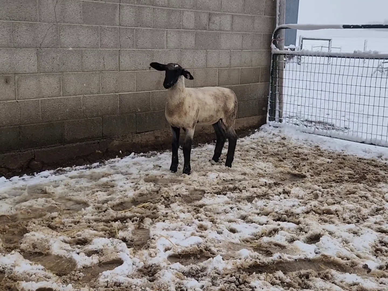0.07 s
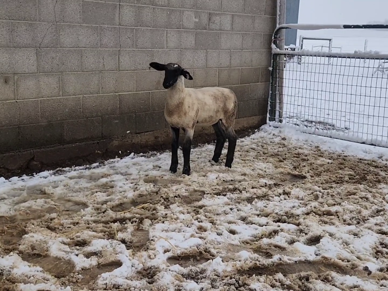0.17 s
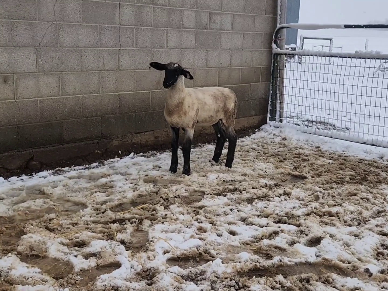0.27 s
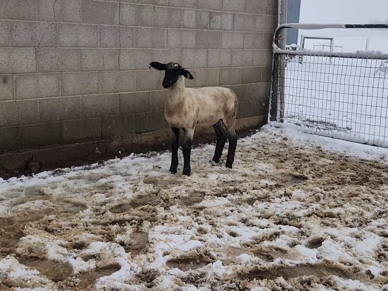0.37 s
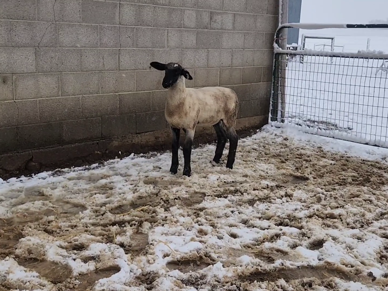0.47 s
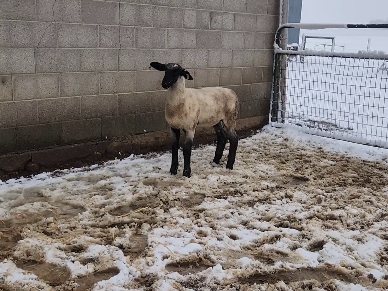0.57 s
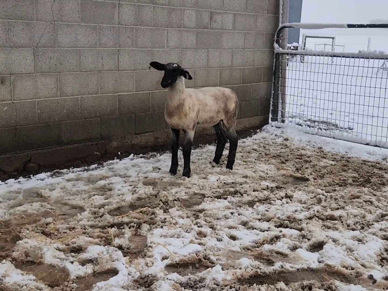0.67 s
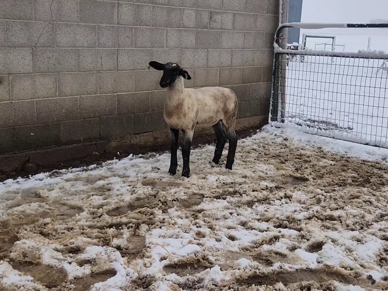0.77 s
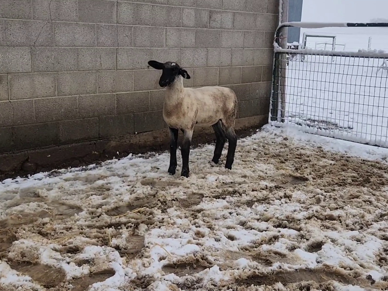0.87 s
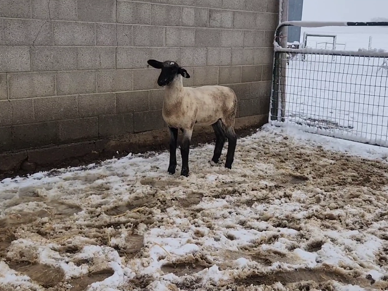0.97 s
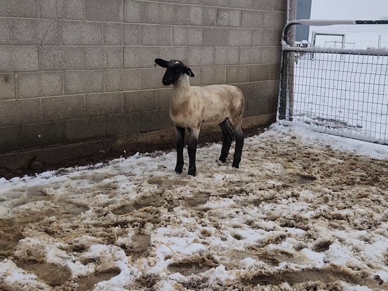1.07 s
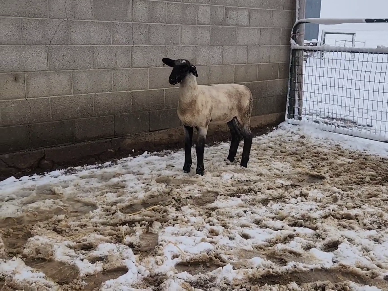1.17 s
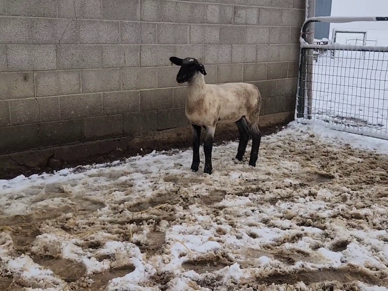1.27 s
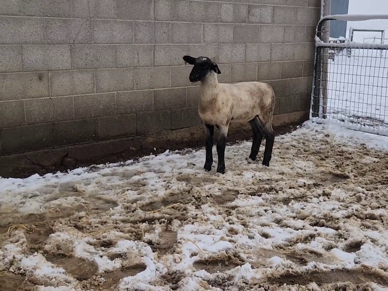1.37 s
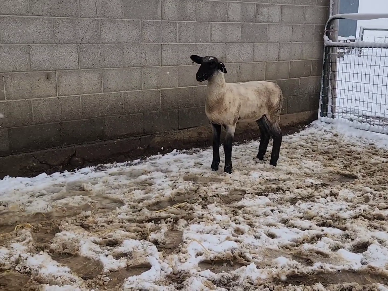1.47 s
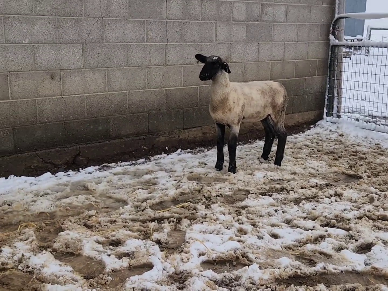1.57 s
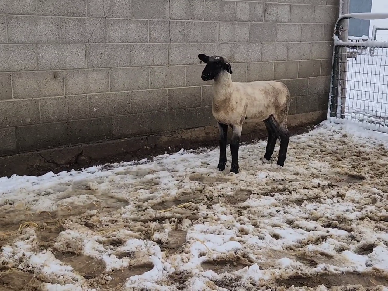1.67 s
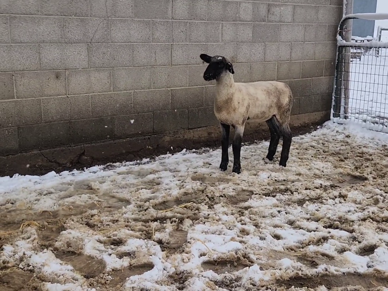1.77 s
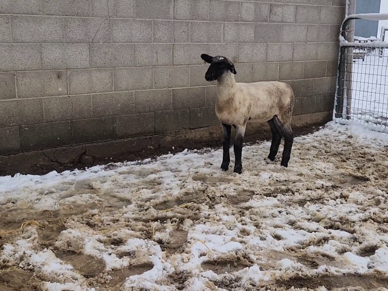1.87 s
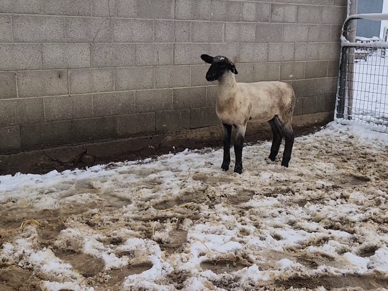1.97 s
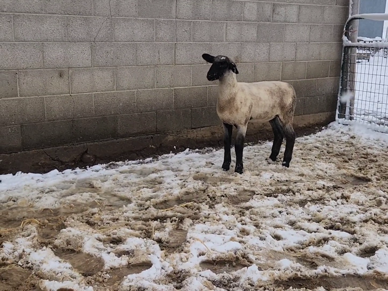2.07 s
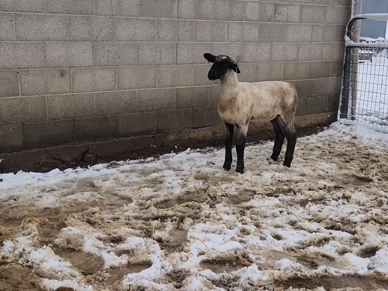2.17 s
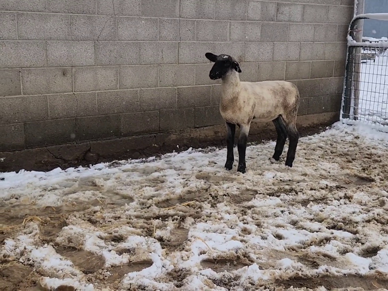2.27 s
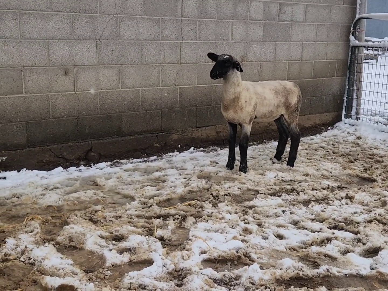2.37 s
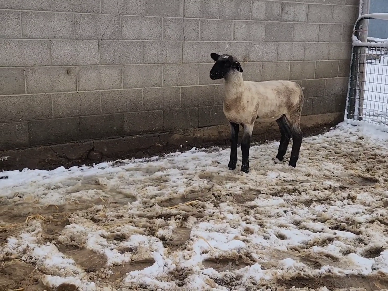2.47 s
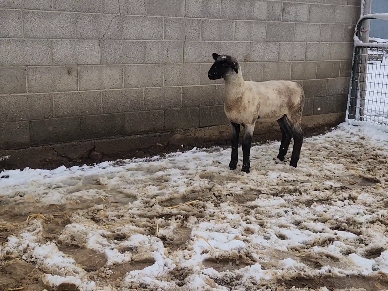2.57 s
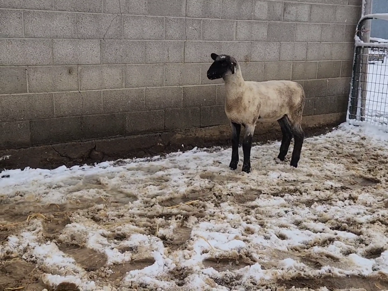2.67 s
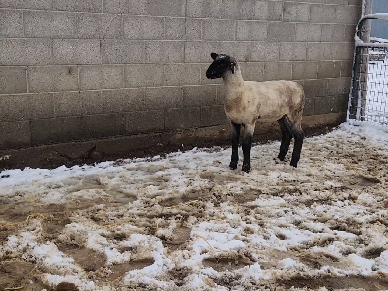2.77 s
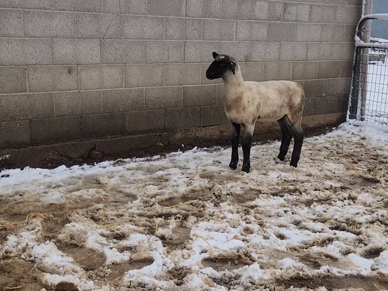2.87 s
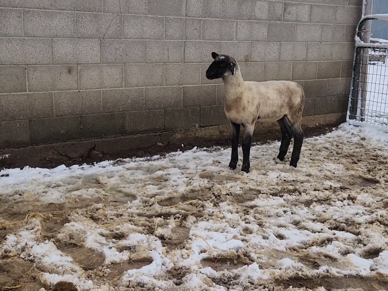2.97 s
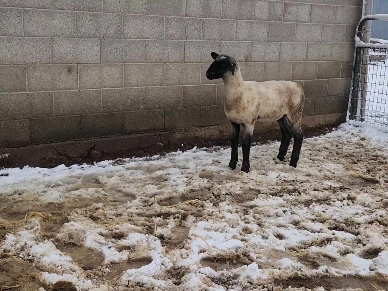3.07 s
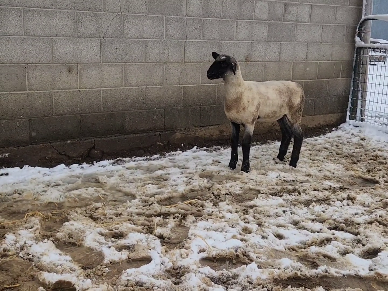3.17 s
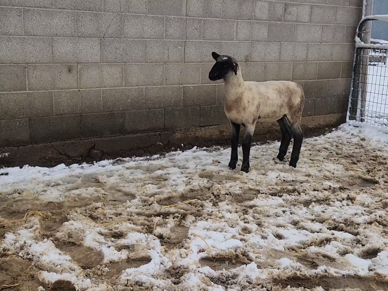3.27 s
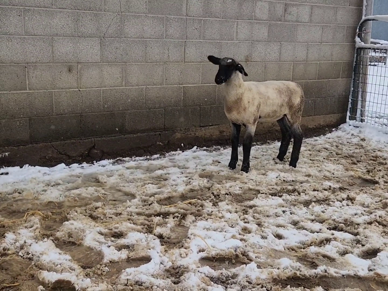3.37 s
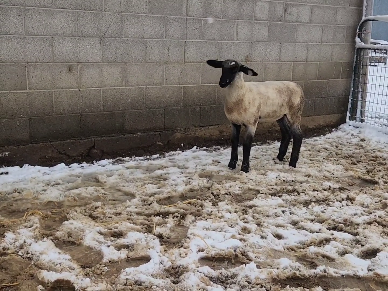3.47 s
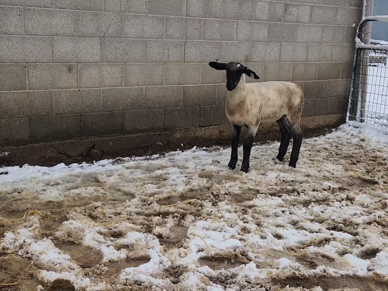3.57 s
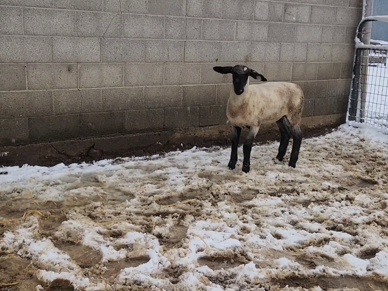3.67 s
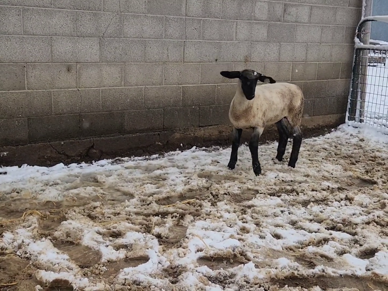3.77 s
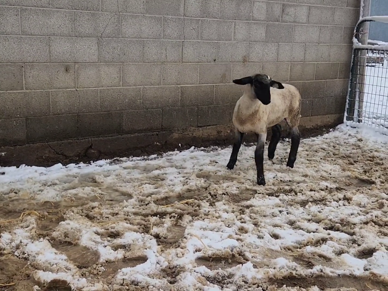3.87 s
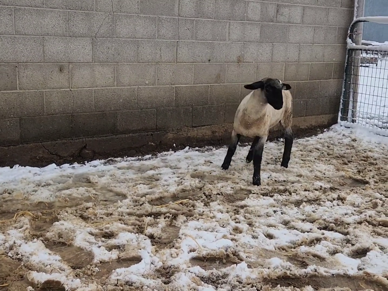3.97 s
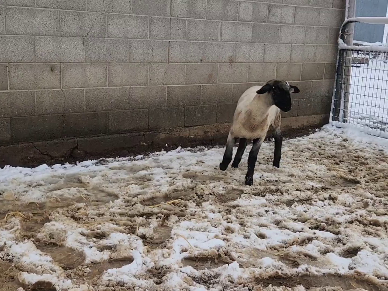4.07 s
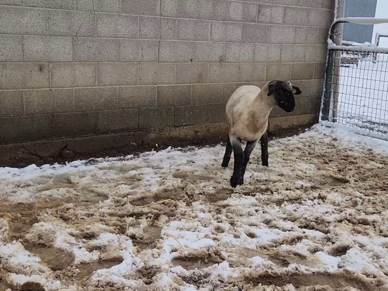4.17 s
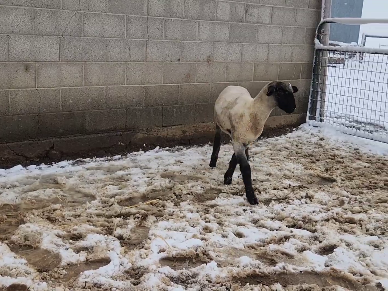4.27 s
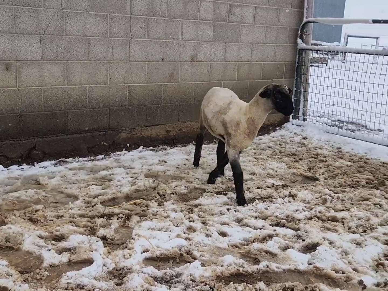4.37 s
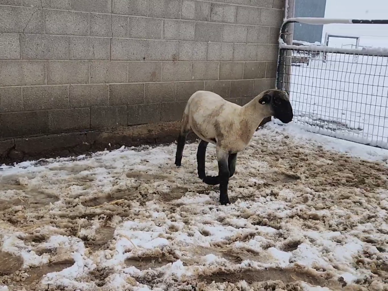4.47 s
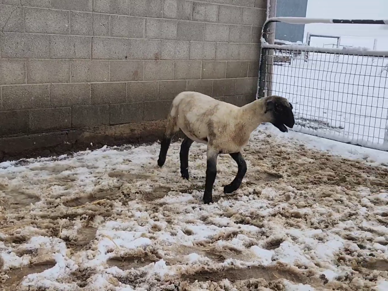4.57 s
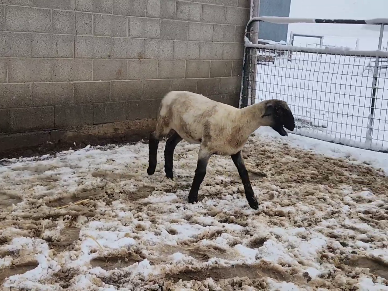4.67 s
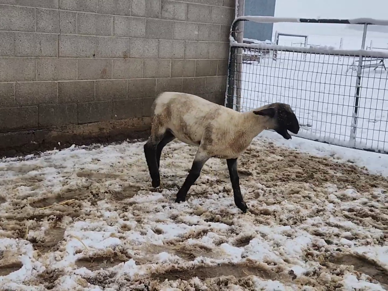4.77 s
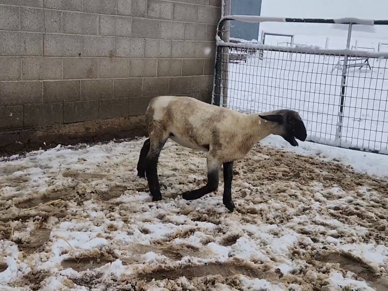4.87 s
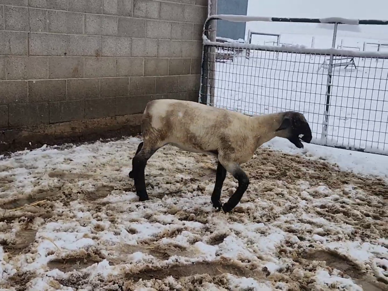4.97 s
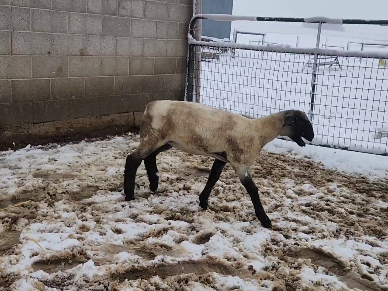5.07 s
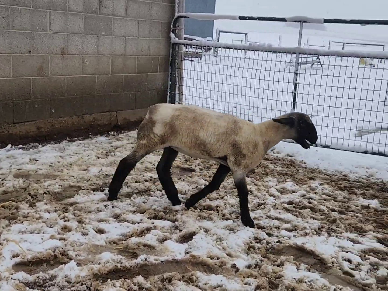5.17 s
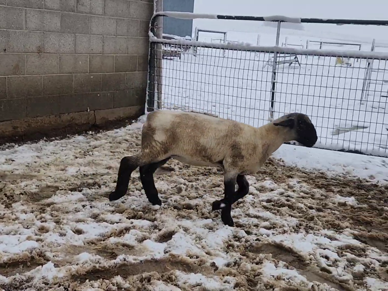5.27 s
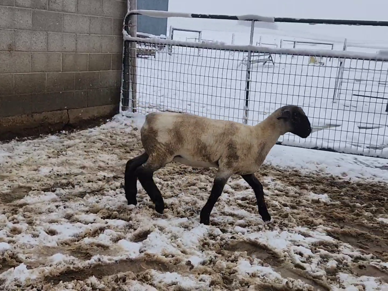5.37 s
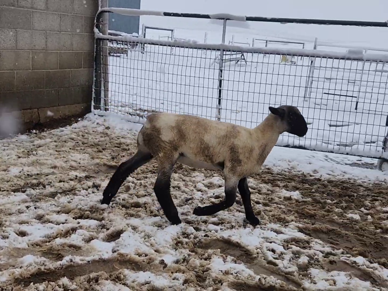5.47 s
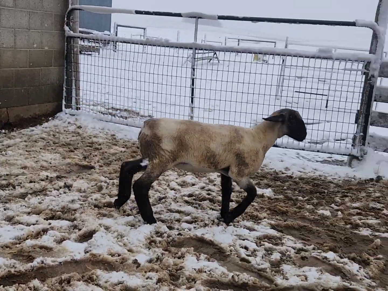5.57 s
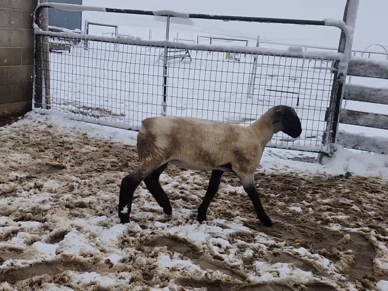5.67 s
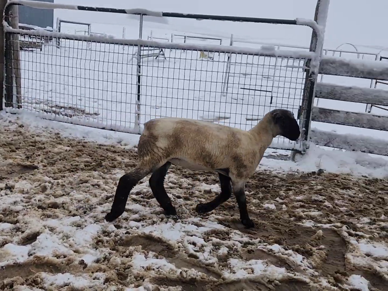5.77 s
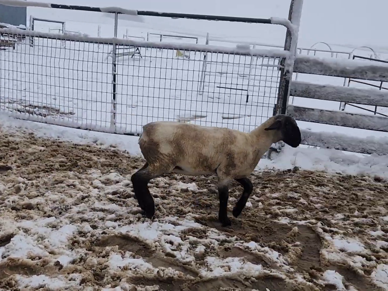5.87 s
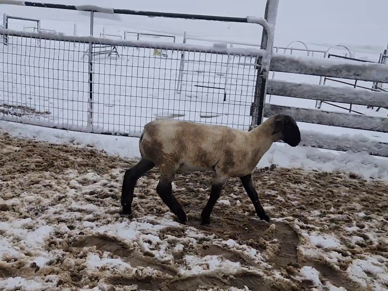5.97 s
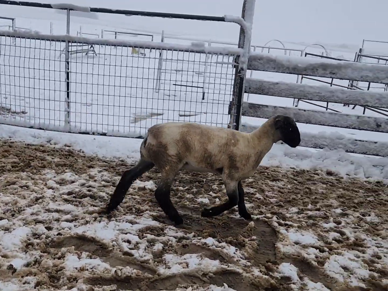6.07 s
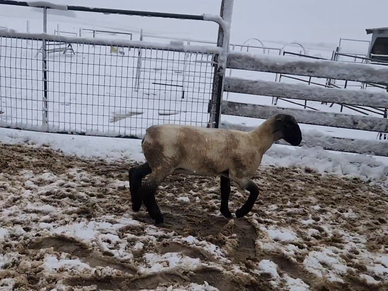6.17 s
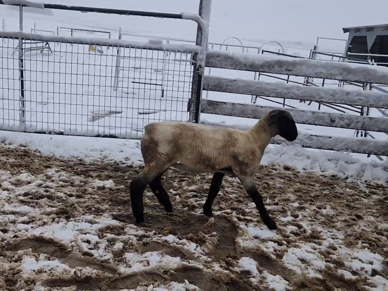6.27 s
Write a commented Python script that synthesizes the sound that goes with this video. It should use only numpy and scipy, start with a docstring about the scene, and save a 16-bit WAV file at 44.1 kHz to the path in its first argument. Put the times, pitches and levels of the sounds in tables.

```python
"""A lamb's hum and hoarse bleat

A lamb in a snowy pen hums with closed mouth, then bleats once, loud and hoarse, beside a block wall.
Its voice is a buzz shaped by nose or throat, shaken by a flutter; shaped noise makes the wall's answer.
Near the microphones shaped noise rustles in strokes, slush ticks, and fading low tones thud.
A light wind rumbles in slowly swelling low noise, over a faint hush."""
import sys
import numpy as np
from scipy import signal
from scipy.fft import rfft, irfft, next_fast_len
from scipy.io import wavfile
from scipy.ndimage import map_coordinates

SR = 44100
rng = np.random.default_rng(int(sys.argv[2]) if len(sys.argv) > 2 else 0)


def master(y):
    """Save y as 16-bit WAV."""
    cut = np.clip(np.atleast_2d(y).T, -1, 1)
    pcm = np.round(cut * 32767)  # scale
    wavfile.write(sys.argv[1], SR, pcm.astype(np.int16))


N = 278403  # length in samples


def amp(db):
    """Turn decibels into a gain."""
    return 10 ** (np.asarray(db) / 20)


def unit(x):
    """Scale a sound to an rms level of 1."""
    return x / np.sqrt(np.mean(x ** 2) + 1e-20)


def along(points, hz):
    """Read a curve of (Hz, value) points at any frequency, on a log axis."""
    point_hz, value = np.transpose(points)
    return np.interp(np.log(hz + 1), np.log(point_hz + 1), value)


def curves(rows, t):
    """Read each column after the time column at the times t."""
    time_s, *columns = np.transpose(rows)
    return [np.interp(t, time_s, column) for column in columns]


def wobble(rate, size):
    """Make a smooth random curve with rate random points a second."""
    points = rng.standard_normal(int(size * 2000 / SR) + 4)
    return map_coordinates(points, [np.arange(size) * rate / SR])


def filtered(x, response):
    """Change the strength and timing of each frequency in x by a response."""
    size = next_fast_len(x.shape[-1] + 8192)
    spectrum = rfft(x, size) * response(np.fft.rfftfreq(size, 1 / SR))
    return irfft(spectrum, size)[..., :x.shape[-1]]


def causal(points, hz):
    """Build a response from (Hz, dB) points that reacts as promptly as it can (minimum phase)."""
    cepstrum = irfft(np.log(amp(along(points, hz)) + 1e-6))
    middle = len(cepstrum) // 2
    cepstrum[1:middle] *= 2
    cepstrum[middle + 1:] = 0
    return np.exp(rfft(cepstrum, 2 * len(hz) - 1))


def ports(x, balance, lead_s):
    """Two microphones hear x with unequal colour, the left one lead_s earlier."""
    def half(hz):
        return amp(along(balance, hz) / 2) * np.exp(1j * np.pi * hz * lead_s)
    return filtered(x * np.ones((2, 1)), lambda hz: [half(hz), 1 / half(hz)])


def noise(spectrum, alike, grainy_db, rate):
    """Make two partly alike noises that flicker in level together, at rms 1."""
    a, b = rng.standard_normal((2, N)) * amp(grainy_db * wobble(rate, N))
    turn = np.arccos(np.clip(alike, 0, 1)) / 2
    pair = np.cos(turn) * a + np.sin(turn) * b * np.array([[1], [-1]])
    return unit(filtered(pair, lambda hz: amp(along(spectrum, hz))))


def crackle(events, width):
    """Bursts of noise around a centre pitch that start at once and die away."""
    out = np.zeros(N + SR)
    t = np.arange(SR // 4) / SR
    for start_s, level_db, centre_hz, t60_s in events:
        def band(hz):
            spread = 1j * hz * width
            return (spread / (centre_hz - hz ** 2 / centre_hz + spread)) ** 2
        grain = unit(filtered(rng.standard_normal(len(t)), band))
        out[round(start_s * SR):][:len(t)] += amp(level_db - 60 * (t / t60_s) ** 0.96) * grain
    return out[:N]


def lamb():
    """The lamb's voice: the hum, then the bleat, placed in the full-length sound."""
    start = round(4.46 * SR)
    t = np.arange(start, start + SR) / SR
    voice = hum(t) + bleat(t)
    return np.pad(voice, (start, N - start - len(t)))


def folds(pitch_hz, bend, jitter):
    """Vocal folds open and close: their phase, and a buzz of equally strong overtones."""
    phase = 2 * np.pi * np.cumsum(pitch_hz * (1 + jitter)) / SR + bend
    buzz = np.cos(np.arange(1, 56)[:, None] * phase).sum(axis=0)
    return phase, unit(buzz)


def hum(t):
    """With closed lips a plain tone is heard, plus a weaker buzz and hiss coloured by the nose."""
    # the hum's course: time_s, pitch_hz (before jitter), level_db (of the plain tone)
    hum_course = [(4.46, 224.3, -73), (4.482, 223.8, -31), (4.504, 216.3, -22), (4.562, 231.7, -23),
                  (4.588, 251, -29), (4.67, 250.6, -32)]
    # colour of the leak past the closed lips: frequency_hz, level_db (relative)
    nose_colour = [(240, -44.5), (400, -14), (770, 5), (941, -14), (1210, -7), (1550, -15.5), (2100, -12.5),
                   (5000, -41.5), (6500, -78.5), (11000, -120)]
    pitch_hz, level_db = curves(hum_course, t)
    phase, buzz = folds(pitch_hz, 0, 0.042 * wobble(120, len(t)))
    leak = unit(filtered(0.4 * buzz + rng.standard_normal(len(t)), lambda hz: causal(nose_colour, hz)))
    tone = np.sqrt(2) * np.sin(phase)
    return amp(level_db) * (tone + amp(-12.0) * leak) * (t < hum_course[-1][0])


def bleat(t):
    """The folds buzz through the open throat and mouth while a slower fold flutters against them."""
    # the bleat's course: time_s, pitch_hz (before jitter), level_db (before tremble and trims)
    bleat_course = [(4.56, 262.3, -39), (4.61, 269.7, -26.5), (4.624, 274.9, -12), (4.69, 282.8, -11.5),
                    (4.73, 278, -9.5), (4.79, 266.9, -8.5), (4.86, 280, -10.5), (4.95, 267.2, -10.5),
                    (5.05, 284.1, -9), (5.13, 255.2, -10.5), (5.165, 234.8, -14), (5.21, 232.4, -14),
                    (5.246, 228.5, -22), (5.286, 214.3, -29), (5.33, 208.3, -54.5)]
    # lowest tone of the voice: time_s, level_db
    lowest_tone = [(4.66, -50), (4.73, -37.5), (4.78, -30.5), (5.05, -31.5), (5.16, -39.5), (5.2, -66),
                   (5.246, -32.5), (5.3, -51)]
    # strength of the flutter: time_s, depth (0 to 1)
    flutter_depth = [(4.68, .9), (4.76, .45), (5.13, .4), (5.155, .03), (5.195, .03), (5.22, 1)]
    # colour of the throat: frequency_hz, level_db (relative)
    throat_colour = [(150, -66.5), (420, -22), (560, -13), (700, -3.5), (840, 1.5), (950, -14),
                     (1080, -35.5), (1200, -58.5), (16000, -99)]
    # upper resonances early in the call: frequency_hz, level_db (relative)
    mouth_wide = [(620, -50.5), (1050, -5), (1220, -14.5), (1400, 0.5), (1560, -10.5), (1900, 0),
                  (2250, -8.5), (2520, -3.5), (2850, -12), (3200, -10.5), (3600, -19), (4400, -19.5),
                  (4950, -35), (5550, -22), (6400, -41.5), (7300, -31), (8700, -43.5), (13000, -41),
                  (15800, -48)]
    # upper resonances late in the call: frequency_hz, level_db (relative)
    mouth_narrow = [(620, -54.5), (1050, -16), (1240, -7.5), (1430, 1), (1600, -4.5), (1980, -4),
                    (2270, -8), (2600, -16), (2900, -12), (3300, -13.5), (3700, -18), (4350, -19),
                    (4950, -30), (5600, -25), (6400, -46), (7250, -29), (8600, -52), (13200, -44),
                    (15800, -54.5)]
    n = len(t)
    start_s, end_s = bleat_course[0][0], bleat_course[-1][0]
    pitch_hz, level_db = curves(bleat_course, t)
    (low_db,), (depth,) = curves(lowest_tone, t), curves(flutter_depth, t)
    rough = .5 * depth

    # the flutter starts near 74 Hz and quickens by 52 Hz each second
    flutter_hz = 74 + 52 * (t - start_s)
    beat = 2 * np.pi * np.cumsum(flutter_hz * (1 + 0.0615 * wobble(40, n))) / SR
    # it swells the buzz and hurries its cycles together, so the upper side lines are the stronger
    hurry = depth * np.sin(beat)
    swell = 1 + depth * np.cos(beat) + 0.18 * depth * np.cos(2 * beat)
    swell = swell * amp(0.37 * wobble(45, n))

    jitter = .05 * rough * wobble(150, n) + .006 * wobble(22, n)
    phase, buzz = folds(pitch_hz, .35 * hurry, jitter)
    rasp = folds(pitch_hz, .5 * hurry, jitter)[1]  # the sharp closing edge is shaken harder
    puffs = rng.standard_normal(n) * (1 + np.cos(phase))  # air hisses once a cycle
    throat = unit(filtered(buzz * swell + 2.1 * rough * puffs, lambda hz: causal(throat_colour, hz)))

    edge = (rasp * swell + rough * puffs) * amp(.8 * wobble(60, n))
    wide, narrow = filtered(edge, lambda hz: [causal(mouth_wide, hz), causal(mouth_narrow, hz)])
    closing = np.clip((t - 4.8) / 0.39, 0, 1)
    mouth = (1 - closing) * unit(wide) + closing * unit(narrow)

    level_db = level_db + 0.36 * np.cos(2 * np.pi * 20.3 * (t - 4.756))  # the belly trembles
    # upper resonances dim from 5.2 s, by 10.5 dB each second, as the mouth shuts
    mouth_db = level_db - 12 - 10.5 * np.clip(t - 5.2, 0, 1)
    fundamental = amp(low_db) * np.sqrt(2) * np.sin(phase - 0.11 * hurry)
    sounding = (t > start_s) & (t < end_s)
    return (amp(level_db - 1.5) * throat + amp(mouth_db) * mouth + fundamental) * sounding


def wall(x):
    """Wall and ground answer briefly, differently at each microphone, anew as the lamb walks on."""
    # how long the answer lasts: frequency_hz, t60_s (time to fade by 60 dB)
    fade_times = [(300, 0.043), (1500, 0.11), (8000, 0.051)]
    out = np.zeros((2, N))
    place = np.arange(N) / SR / .11  # a new place every 0.11 s
    for k in range(40, 50):  # the places passed during the call
        hz, t, tail = signal.stft(rng.standard_normal((2, SR // 4)), SR, nperseg=128)
        fade_db = -60 * t / along(fade_times, hz)[:, None]
        colour_db = along([(300, -39.5), (1500, 26.5)], hz)[:, None]
        tail = signal.istft(tail * amp(fade_db + colour_db), SR, nperseg=128)[1]
        # neighbouring places crossfade; the answer comes 120 samples late
        part = np.pad(x * np.clip(1 - abs(place - k), 0, 1), (120, 0))
        out += signal.fftconvolve(part[None], tail / np.linalg.norm(tail[0]), axes=1)[:, :N]
    return out


def scrapes():
    """Duller scrapes and knocks: noise bursts, some short and some slow to fade."""
    # scrapes: start_s, level_db (at the start), centre_hz, t60_s (time to fade by 60 dB)
    scrape_list = [(.156, -33, 816, 0.012), (.168, -46, 1370, 0.38), (.285, -34, 3555, 0.1),
                   (.415, -35.5, 343, 0.065), (.73, -52, 530, 0.66), (1.145, -54, 1240, 0.65),
                   (1.225, -41.5, 2100, 0.062), (1.69, -36, 2120, .02), (1.705, -41, 315, 0.22),
                   (2.54, -52.5, 553, 1), (2.64, -46.5, 650, 0.16), (3.43, -41.5, 970, 0.029),
                   (3.54, -42.5, 570, 0.03), (3.765, -49.5, 406, 0.21), (3.92, -55.5, 1390, 0.087),
                   (4.1, -60, 1440, 0.11), (5.515, -51, 1325, 0.13), (5.785, -42.5, 1284, 0.16)]
    return crackle(scrape_list, width=.7)


def rustle():
    """Strokes of friction close on the left: a fizz of sudden slips over a duller body; one long swell of hiss
    around 5.2 s trails the end of the bleat."""
    # strokes: peak_s, rise_s and fall_s (each spans 21 dB), fizz_db (before the gains below),
    # body_db (relative to the fizz, before the gains below)
    stroke_list = [(0.0, .05, .12, -39, -3.5), (.19, 0.19, 0.48, -55.5, -2.5),
                   (0.416, 0.075, 0.036, -40.5, -9.5), (0.701, 0.066, 0.18, -51.5, -4.5),
                   (0.791, 0.19, 0.082, -53.5, 2), (0.919, 0.094, 0.11, -62, -3),
                   (1.035, 0.025, 0.6, -57, -10), (1.22, 0.25, 0.14, -55, -1), (1.49, 0.6, 0.16, -64.5, 0),
                   (1.6, .05, 0.069, -71, 2), (1.679, 0.02, 0.26, -47.5, -1.5),
                   (1.82, 0.25, 0.17, -50.5, -5.5), (1.935, 0.013, .12, -49, -9.5),
                   (2.059, 0.21, 0.23, -49.5, -3), (2.215, .03, 0.094, -52.5, -3.5),
                   (2.33, 0.16, 0.39, -52.5, -7), (2.541, 0.066, 0.28, -50, -1),
                   (2.82, .08, 0.089, -55, -9), (3.065, 0.021, .05, -52, -7.5),
                   (3.11, 0.046, 0.076, -49, -4.5), (3.25, 0.034, 0.031, -55.5, -5),
                   (3.48, 0.27, 0.12, -59, -3), (3.59, 0.07, 0.07, -62, -8),
                   (3.735, 0.033, 0.027, -56, -25), (3.92, 0.042, 0.039, -47.5, -20),
                   (4.1, 0.043, 0.027, -50.5, -24), (4.302, .05, .04, -58, -28),
                   (4.379, 0.043, 1, -50.5, -5), (5.2, 0.78, 0.24, -50, 3), (5.425, 0.014, 0.045, -52, -9),
                   (5.521, 0.15, 0.084, -51, -9), (5.64, 0.013, 0.14, -54.5, -15.5),
                   (5.771, 0.028, 0.087, -41, -9.5), (6.036, 0.046, 0.051, -53.5, -12),
                   (6.085, 0.032, 0.05, -50, -13), (6.208, 0.0087, .04, -62.5, -25),
                   (6.26, 0.059, 0.05, -48, -17)]
    # colour of the fizz: frequency_hz, level_db (relative)
    fizz_colour = [(1530, -22), (2600, -12.5), (2720, -10.5), (3190, 0), (3520, -2), (3910, 3), (6890, -1),
                   (7480, 3.5), (9750, -8.5), (12600, -1), (15800, -8.5)]
    # colour of the body: frequency_hz, level_db (relative)
    body_colour = [(210, -8), (350, -3), (399, -15), (598, -7), (974, -13.5), (1840, -10), (2120, -7.5),
                   (2680, -15.5), (3300, -15.5), (4290, -36), (7260, -120)]
    t = np.arange(N) / SR
    fizz, body = np.zeros((2, N))
    for peak_s, rise_s, fall_s, fizz_db, body_db in stroke_list:
        away = np.where(t < peak_s, (peak_s - t) / rise_s, (t - peak_s) / fall_s)
        stroke = amp(fizz_db - 21 * np.abs(away) ** 1.08)
        fizz = np.maximum(fizz, stroke)
        body = np.maximum(body, amp(body_db) * stroke)
    # about 70 slips a second; each starts at once and dies away
    slips = (rng.random(N) < 70 / SR) * rng.exponential(size=N)
    slips = signal.lfilter([1], [1, -np.exp(-1 / (.012 * SR))], slips)
    fizz = fizz * unit(1 + .4 * slips) * noise(fizz_colour, alike=0.068, grainy_db=0.5, rate=420)
    body = body * amp(3.5 + 1.43 * wobble(30, N))
    body = body * noise(body_colour, alike=0.65, grainy_db=1.5, rate=140)
    return (fizz + body) * amp([[1.8], [1.9]])  # left and right gain in dB


def ticks():
    """Bright ticks of slush: noise bursts that fade by 60 dB in 14 ms."""
    # ticks: start_s, level_db (at the start, before the trim below), centre_hz
    tick_list = [(0.193, -39, 3200), (0.3678, -37, 3180), (0.5716, -48.5, 3970), (1.029, -43, 13900),
                 (1.675, -35, 6513), (1.93, -38, 5800), (2.4083, -51, 5160), (2.5238, -42, 5380),
                 (2.7854, -49.5, 3070), (2.92, -47.5, 7680), (2.9827, -45, 13250), (3.0109, -48, 7730),
                 (3.0984, -43.5, 6490), (3.1162, -30.5, 4930), (3.248, -42, 6340), (3.55, -46, 5530),
                 (3.7289, -44, 7510), (4.1757, -49.5, 10080), (4.36, -41.5, 5500), (5.405, -51, 12330),
                 (5.4218, -38, 12150), (5.5765, -54.5, 7240), (5.6024, -47, 7010), (5.633, -35.5, 14100),
                 (5.643, -37.5, 12730), (5.6757, -43.5, 7000), (5.7531, -38, 7200), (5.7689, -33, 7950),
                 (5.7733, -38, 7680), (5.915, -48.5, 6930), (6.0783, -33, 7550), (6.111, -44, 12100),
                 (6.288, -41, 9000)]
    return amp(-3.5) * crackle([(*row, .014) for row in tick_list], width=.8)


def thuds():
    """A soft push makes a low tone that swells in quickly and soon fades."""
    # thuds: start_s, level_db (before the boost and fades below), pitch_hz, t60_s (60 dB fade time)
    thud_list = [(0.149, -43.5, 102, 0.037), (0.411, -44.5, 112, 0.094), (0.504, -42, 107, 0.039),
                 (1.688, -25, 233, 0.035), (2.686, -45, 232, 0.042), (2.889, -45.5, 132, 0.061),
                 (3.274, -35, 89, 0.057), (3.321, -42.5, 100, 0.04), (3.763, -33.5, 104, 0.027),
                 (5.916, -43.5, 124.6, 0.041), (5.953, -42, 100, 0.042)]
    out = np.zeros(N + SR)
    t = np.arange(SR // 8) / SR
    onset = 1 - np.exp(-t / 0.0033)
    for start_s, level_db, pitch_hz, t60_s in thud_list:
        fade = amp(level_db + 14.5 - 60 * t / t60_s)
        out[round(start_s * SR):][:len(t)] += fade * onset * np.sin(2 * np.pi * pitch_hz * t)
    return out[:N]


def wind():
    """A lumpy low rumble of air and its lighter buffeting, over the steady hush of the yard."""
    # the wind's course: time_s, rumble_db, pan_db (left minus right)
    wind_course = [(0.0, -45.5, 0), (0.98, -46.5, -0.5), (1.69, -44.5, -0.5), (1.77, -37, 8),
                   (1.88, -52.5, 4), (2.04, -38, -11), (2.43, -45.5, 4), (3.14, -40.5, 4.5),
                   (3.22, -58, -6), (3.27, -40, 6.5), (3.44, -54, -10), (3.55, -38.5, 3),
                   (3.85, -37.5, 7.5), (4.18, -54.5, -3.5), (4.36, -37.5, 7), (4.6, -42.5, -8),
                   (4.64, -41.5, -2.5), (4.94, -44.5, -0.5), (5.06, -37.5, 11.5), (5.15, -47.5, 1.5),
                   (5.57, -46, -0.5), (5.68, -37.5, -6.0), (5.75, -41.5, 4), (5.9, -34, -19.5),
                   (6.27, -42, 6), (6.31, -38, -4)]
    # colour of the rumble: frequency_hz, level_db (relative)
    rumble_colour = [(12, -43), (20, -3.5), (38, 0.5), (54, 0.5), (102, -4.5), (130, -19), (170, -40.5),
                     (290, -120)]
    # colour of the buffeting: frequency_hz, level_db (relative)
    buffet_colour = [(71, -32.5), (120, 2), (198, -5.5), (243, -5.5), (448, -25), (800, -25.5), (1040, -50),
                     (1760, -120)]
    # colour of the quiet yard: frequency_hz, level_db (relative)
    hush_colour = [(180, -24.5), (300, 5.5), (1080, -8.5), (2230, -14), (2770, -26), (3160, -22.5),
                   (6040, -27), (7490, -14.5), (9930, -38.5), (12700, -26.5), (15800, -20)]
    hush = noise(hush_colour, alike=.2, grainy_db=1.8, rate=22)
    rumble_db, pan_db = curves(wind_course, np.arange(N) / SR)
    # the buffeting follows a fifth of the rumble's swings
    buffet_db = -53 + .2 * (rumble_db - rumble_db.mean())
    rumble = amp(rumble_db) * noise(rumble_colour, alike=0.8, grainy_db=3, rate=9)
    buffet = amp(buffet_db) * noise(buffet_colour, alike=.75, grainy_db=2.5, rate=18)
    return amp([pan_db / 2, -pan_db / 2]) * (rumble + buffet) + amp(-60) * hush


def scene():
    """Lamb and scrapes ahead; rustle, ticks, thuds and wind from the left."""
    # balance of the sounds ahead: frequency_hz, balance_db (left minus right)
    ahead_balance = [(60, 7), (180, 1.0), (550, 1), (1650, 2), (4970, -3.5), (15000, 5)]
    # balance of the near sounds: frequency_hz, balance_db (left minus right)
    near_balance = [(60, 1.5), (150, -1), (380, 0.5), (950, 1.5), (2380, -3.5), (5980, 4.5), (15000, 11)]
    voice = lamb()
    ahead = voice + amp(2.5) * wall(voice) + scrapes()
    near = rustle() + ticks() + thuds() + wind()
    return ports(ahead, ahead_balance, lead_s=-0.00011) + ports(near, near_balance, lead_s=0.000328)


def record(dry):
    """Round off the loudest peaks, then keep nothing above 15900 Hz."""
    rounded = dry / (1 + np.abs(dry / .99) ** 10) ** (1 / 10)
    return filtered(rounded, lambda hz: hz < 15900)


dry = scene()
out = record(dry)
master(out)
```